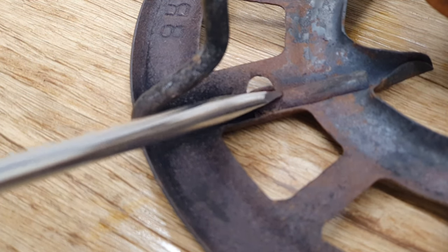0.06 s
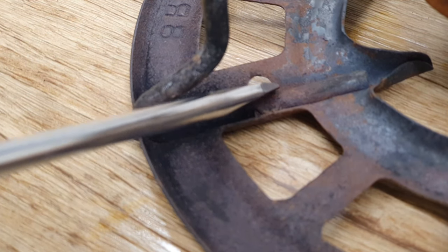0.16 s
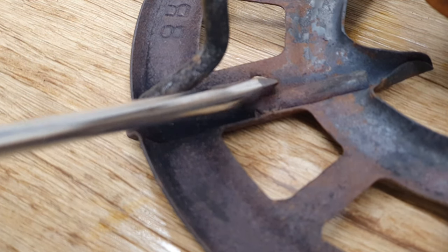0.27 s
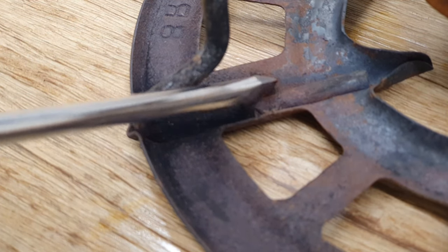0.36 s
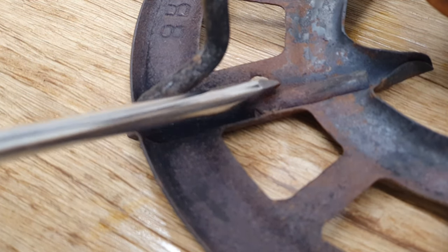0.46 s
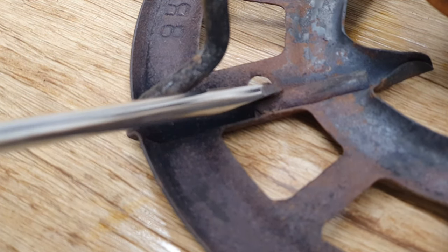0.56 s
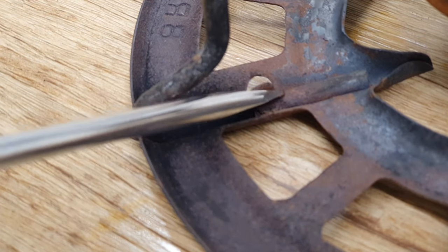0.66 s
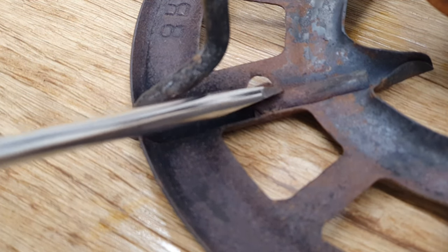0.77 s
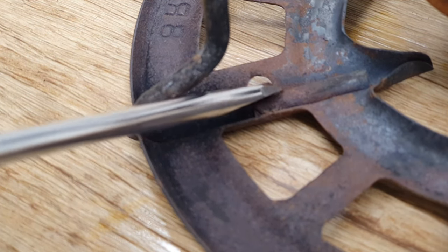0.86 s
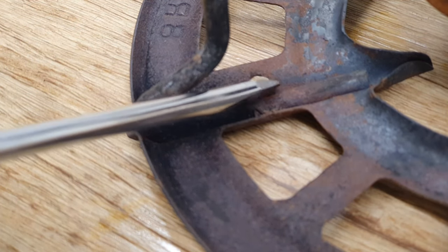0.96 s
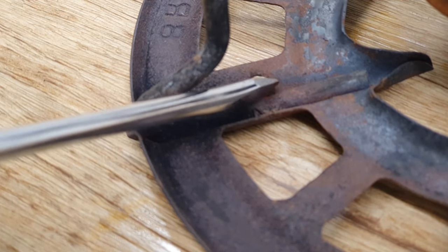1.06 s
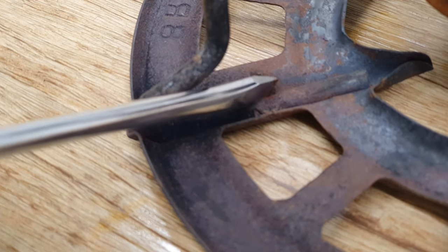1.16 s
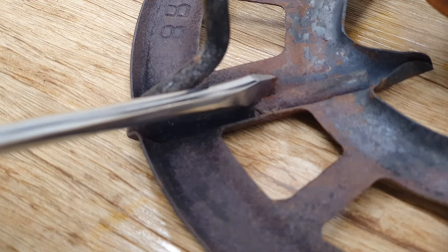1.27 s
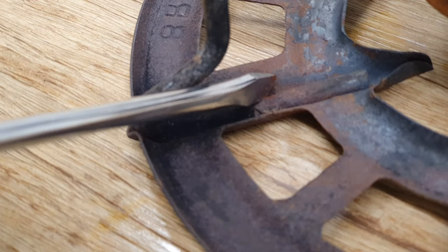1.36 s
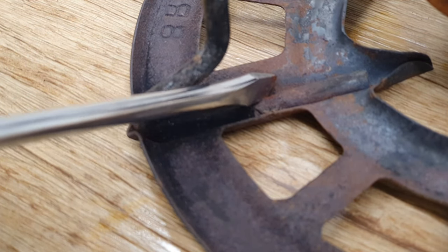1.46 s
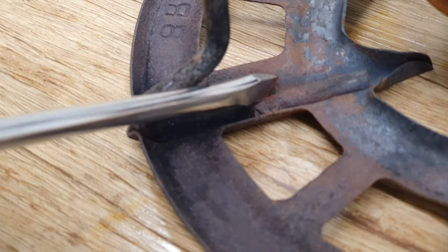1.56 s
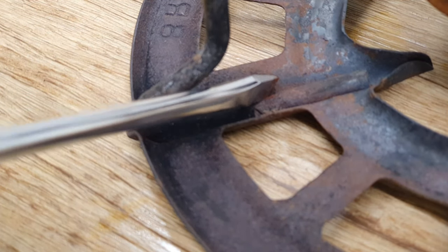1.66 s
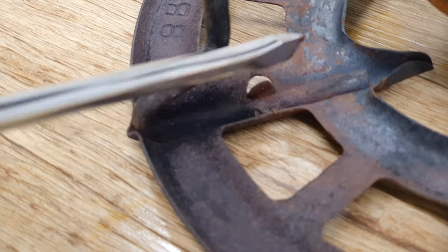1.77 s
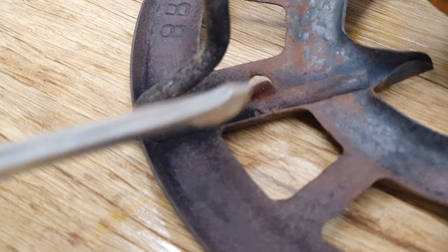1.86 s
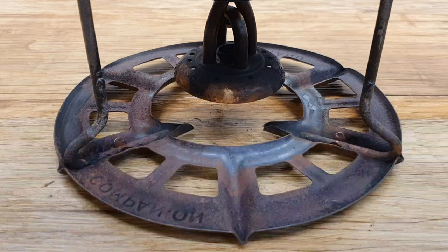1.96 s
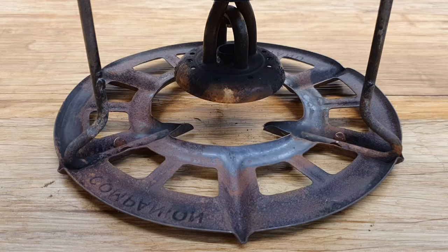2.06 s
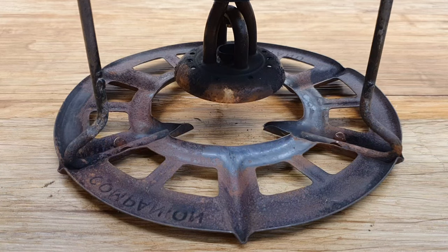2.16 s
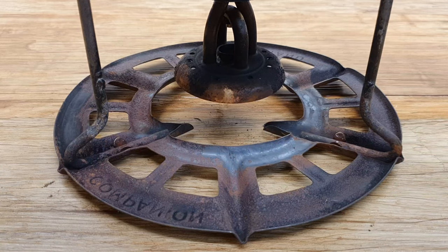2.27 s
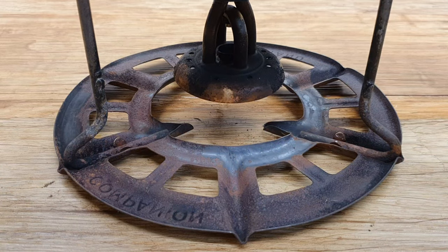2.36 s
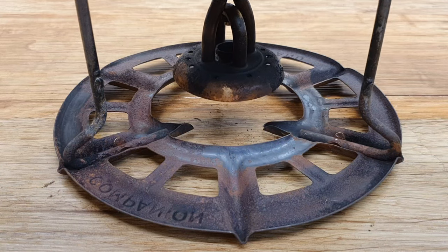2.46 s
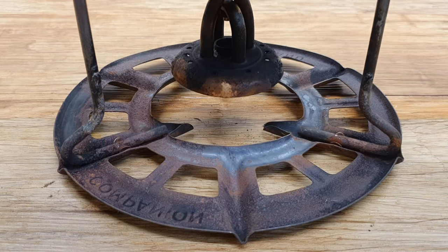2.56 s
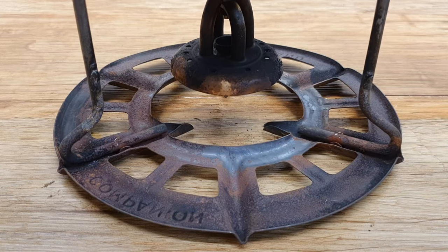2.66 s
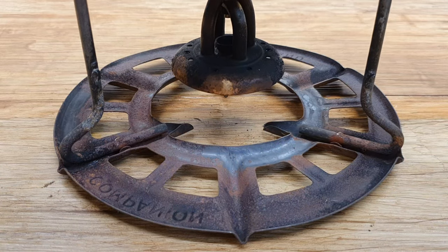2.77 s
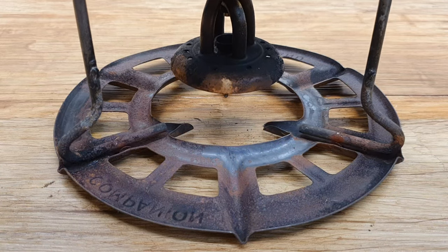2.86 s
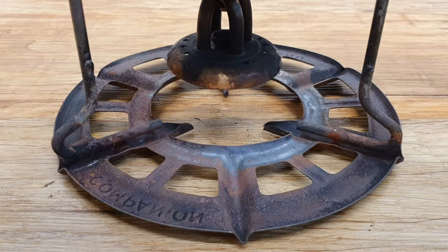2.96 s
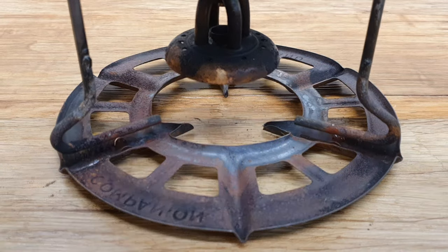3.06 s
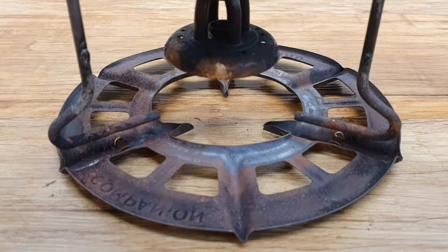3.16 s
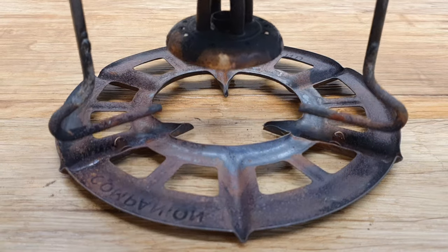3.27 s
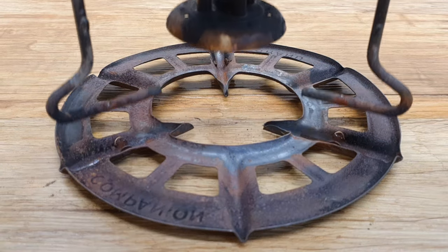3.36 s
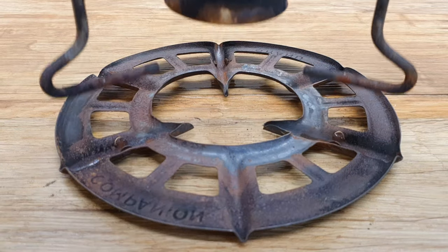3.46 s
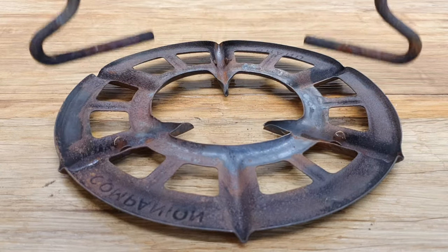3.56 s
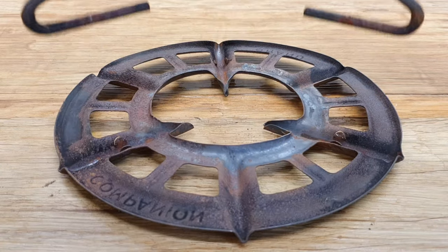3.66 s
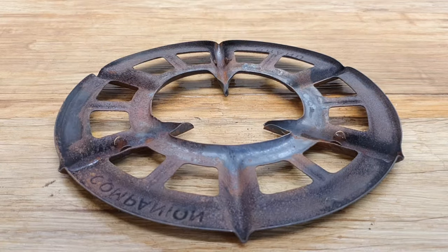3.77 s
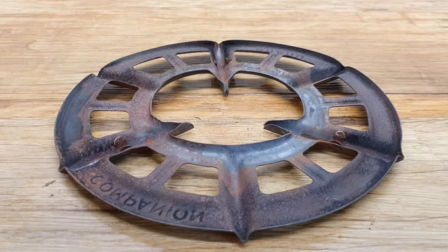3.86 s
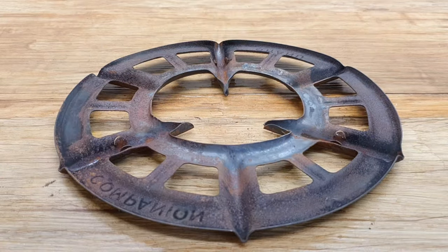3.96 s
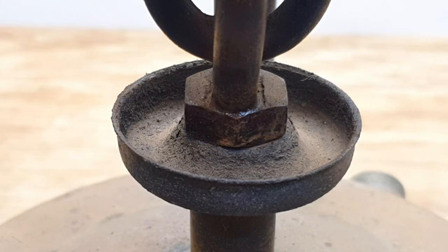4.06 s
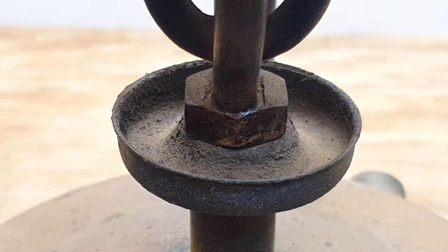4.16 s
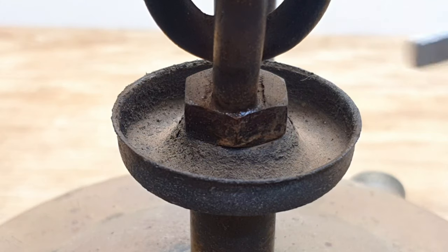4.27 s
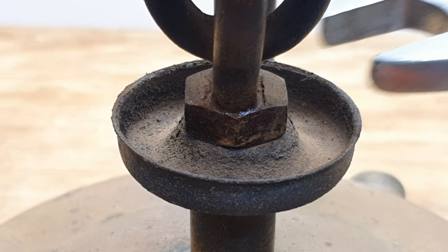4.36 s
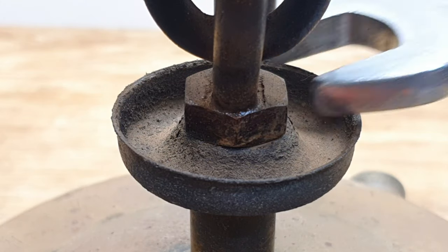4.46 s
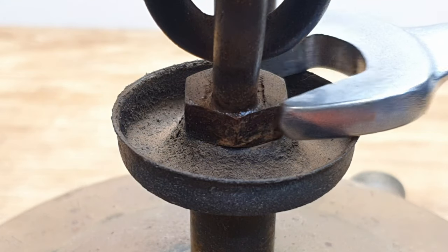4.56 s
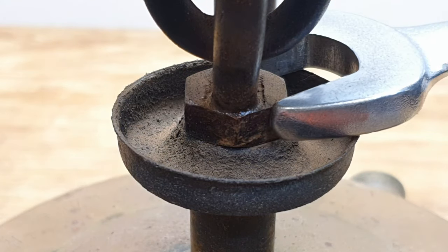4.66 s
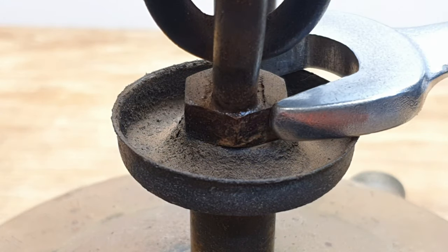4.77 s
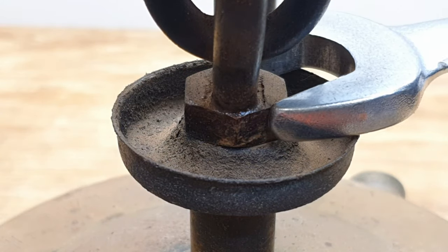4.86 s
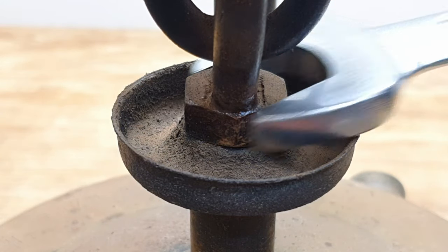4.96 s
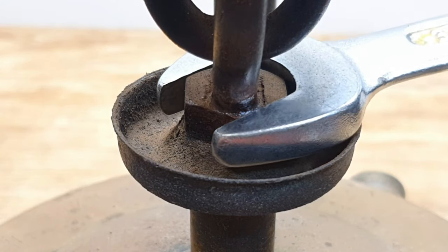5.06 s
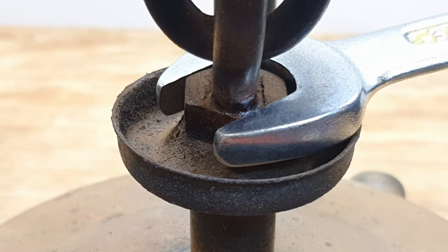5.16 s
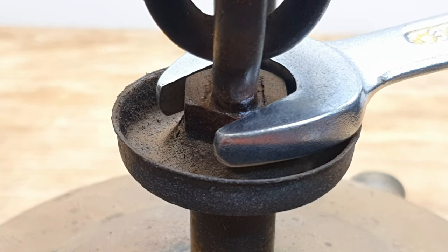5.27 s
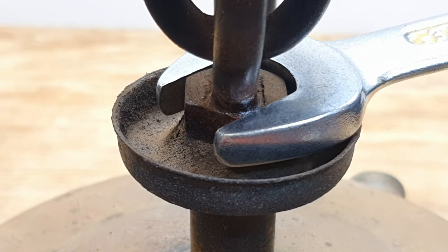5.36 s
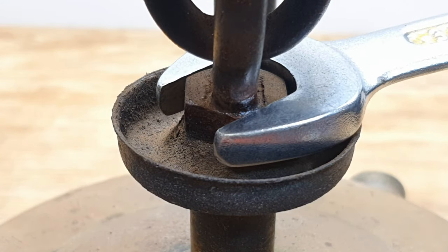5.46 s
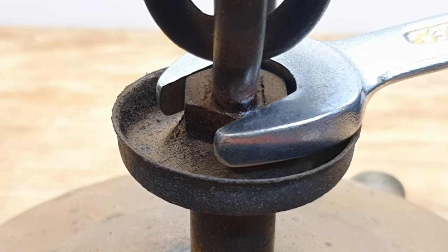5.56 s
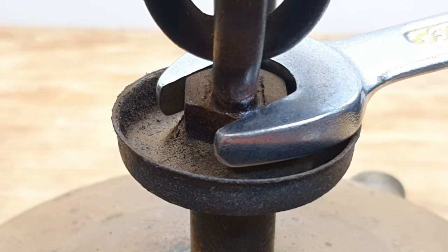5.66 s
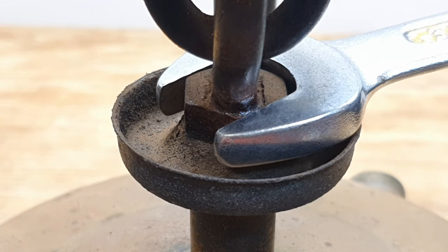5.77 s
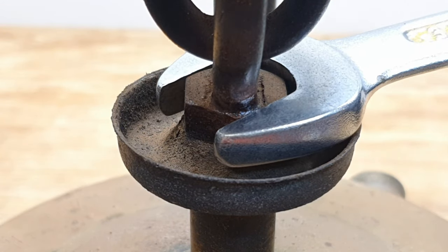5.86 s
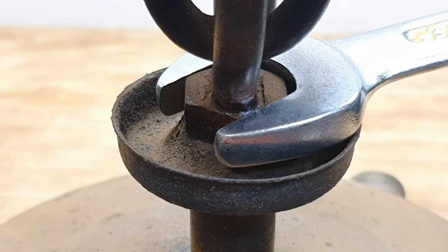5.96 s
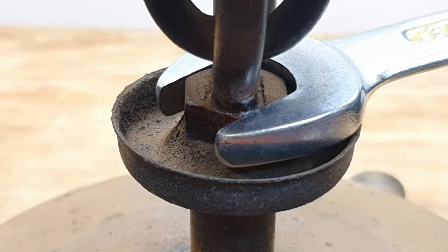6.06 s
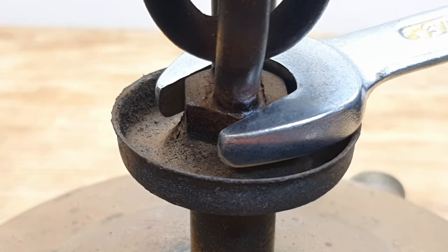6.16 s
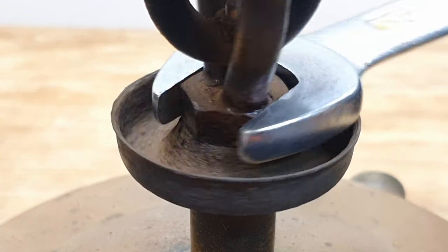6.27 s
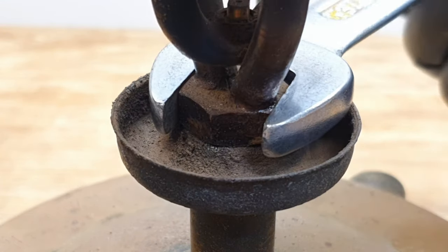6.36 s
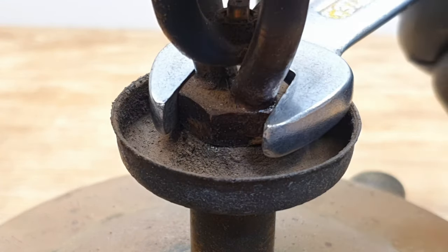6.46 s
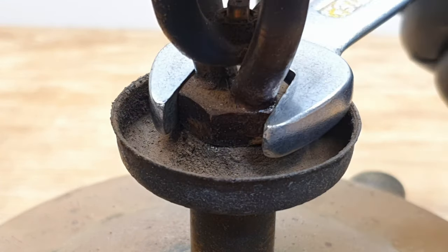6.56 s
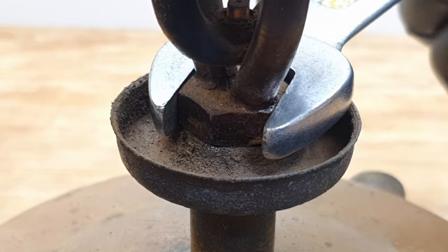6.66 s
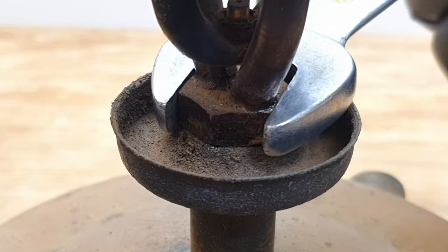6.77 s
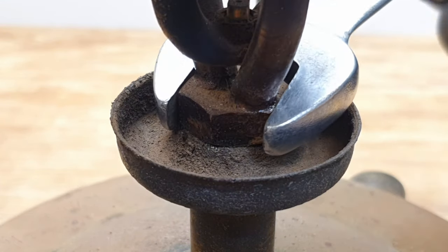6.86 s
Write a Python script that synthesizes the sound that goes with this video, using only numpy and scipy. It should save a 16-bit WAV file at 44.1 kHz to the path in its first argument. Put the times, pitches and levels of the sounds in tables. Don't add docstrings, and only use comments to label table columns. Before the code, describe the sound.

A screwdriver tip picks and scrapes at rusty metal, a wire frame rattles and drags off a grate, then a spanner clanks hard onto a nut.

```python
import sys
import numpy as np
from scipy import signal
from scipy.fft import rfft, irfft, next_fast_len
from scipy.io import wavfile
from scipy.ndimage import uniform_filter1d

SR = 44100
rng = np.random.default_rng(int(sys.argv[2]) if len(sys.argv) > 2 else 0)


def natural_amplitude(level_db):
    exponent = np.asarray(level_db, float) / 20
    return 10 ** exponent


def dump(signal):
    limited = np.clip(np.atleast_2d(signal).T, -1, 1)
    pcm = np.round(limited * 32767).astype(np.int16)
    wavfile.write(sys.argv[1], SR, pcm)


N = 304731
SIZE = next_fast_len(N + SR)
HZ = np.fft.rfftfreq(SIZE, 1 / SR)
TIME = np.arange(N) / SR

# pitch_hz, likeness (0-1)
NEAR_SAME = [(150, 0.2), (600, 0.9), (1200, 0.4), (3000, 0), (16000, 0.6)]
# pitch_hz, level_db (per Hz)
TIP_TONE = [(120, -9), (200, 1.5), (360, -11.5), (529, -5), (722, -14), (916, -13), (1060, -17.5),
            (4200, -16), (5040, -20.5), (7680, -13.5), (10100, -22.5), (12600, -16), (16000, -19.5)]
# pitch_hz, level_db (per Hz)
FRAME_TONE = [(100, -42), (170, -0.5), (284, 10.5), (430, -27), (631, 2.5), (764, -3.5), (1490, -16),
              (1830, -35), (4200, -21), (5000, -17), (7200, -6.5), (14800, -1.5), (16000, -18)]
# pitch_hz, level_db, t60_s
NUT_MODES = [(117, -11.5, 0.11), (137, -16, 0.36), (189, -18, 0.13), (227, -15.5, 0.1207),
             (563, 0.5, 0.042), (1039, -17.5, 0.092), (1400, -3, 0.057), (1868, -4, 0.052),
             (2125, -10.5, 0.22), (2855, -4.5, 0.039), (3090, 0.5, 0.037), (3430, -14.5, 0.068),
             (3502, -2.5, 0.025), (6370, -29, 0.051)]


def evened(x):
    return x / np.sqrt(np.mean(x ** 2) + 1e-20)


def read(points, hz):
    f, value = np.transpose(points)
    return np.interp(np.log(hz + 1), np.log(f + 1), value)


def level_curve(rows):
    s, db = np.transpose(rows)
    return natural_amplitude(np.interp(TIME, s, db))


def add(mix, s, sound):
    part = mix[..., round(s * SR):][..., :sound.shape[-1]]
    part += sound[..., :part.shape[-1]]


def band(hz, lo_hz, hi_hz):
    return 1 / np.sqrt((1 + (lo_hz / (hz + 1)) ** 12) * (1 + (hz / hi_hz) ** 12))


def balance(points):
    return natural_amplitude(read(points, HZ) / 2 * np.array([[1], [-1]]))


def paired(z, hz, likeness):
    late_s = 0.00008
    same = np.clip(read(likeness, hz), 0, 1)
    shared = same * z[0] * np.exp(-2j * np.pi * hz * late_s)
    return np.array([z[0], shared + np.sqrt(1 - same ** 2) * z[1]])


def diffuse(tone):
    # pitch_hz, likeness (0-1)
    room_same = [(60, .93), (250, 0.59), (600, 0.15), (1200, 0.078), (16000, .05)]
    # pitch_hz, level_db
    room_lean = [(60, -0.67), (180, -0.34), (550, -1.5), (1650, 0.8), (4970, 2.5), (15000, 0)]
    z = paired(rfft(rng.standard_normal((2, SIZE))), HZ, room_same)
    return evened(irfft(z * balance(room_lean) * natural_amplitude(read(tone, HZ)), SIZE)[:, :N])


def room_tone():
    # pitch_hz, level_db (per Hz)
    air = [(100, -25.5), (150, -5), (300, -19.5), (600, -22), (1400, -27.5), (2500, -30.5), (6000, -35.5),
           (7700, -36.5), (9000, -43.5), (11000, -38), (13000, -35.5), (16000, -31)]
    # time_s, level_db
    air_level = [(0, -66), (2.08, -71), (2.1, -72), (4.1, -74), (4.15, -72.5), (6.91, -74.5)]
    # pitch_hz, level_db (per Hz)
    rumble = [(12, -49), (20, -8), (76, 7.5), (93, 3.5), (119, -5.5), (173, -12.5), (219, -24),
              (260, -19.5), (340, -50.5), (570, -120)]
    # time_s, level_db
    rumble_level = [(0, -61), (0.55, -58.5), (1.3, -54.5), (1.75, -63.5), (2.3, -61.5), (3.2, -62),
                    (3.95, -64), (4.15, -66.5), (5.9, -68.5), (6.75, -66), (6.91, -53)]
    return level_curve(air_level) * diffuse(air) + level_curve(rumble_level) * diffuse(rumble)


def snaps(rows, tone, low_hz):
    even_db, db_octave_per_db, dullest_db, faint_db = -44, 0.4, -2, -59.7
    out, t = np.zeros((2, N)), np.arange(4096) / SR
    hz = np.fft.rfftfreq(len(t), 1 / SR)
    spectra = rfft(rng.standard_normal((len(rows), 3, len(t))))
    for (s, db, thump_db, t60_ms), z in zip(rows, spectra):
        t60 = max(t60_ms, 3) / 1000
        fall = 0.68 * natural_amplitude(-60 * t / t60) + 0.14 * natural_amplitude(-60 * t / (4 * t60))
        bright_db = max(db_octave_per_db * (db - even_db), dullest_db if db > faint_db else 0)
        tilt_db = read(tone, hz) + bright_db * np.log2(hz / 6000 + 0.072)
        crack = evened(irfft(paired(z, hz, NEAR_SAME) * natural_amplitude(tilt_db) * band(hz, low_hz, SR)))
        thump = evened(irfft(z[2] / (1 + ((hz - 420) / 200) ** 2)))
        rise = np.minimum(t / (0.22 * t60), 1) ** 2
        sound = crack * fall + natural_amplitude(thump_db - 60 * t / 0.041) * thump
        add(out, s - 0.12 * t60, natural_amplitude(db) * sound * rise)
    return out


def pressure(rows, t, bite_s):
    lift_s, settle_s = 0.0064, 0.032
    body_share = 0.5
    start, length, grit_db, bench_db = np.transpose(rows)[..., None]
    rise = np.clip((t - start) / bite_s, 0, 1) ** 3
    past = np.maximum(t - start - length, 0)
    grit = (natural_amplitude(grit_db) * rise * np.exp(-past / lift_s)).sum(0)
    bench = (natural_amplitude(bench_db) * rise * np.exp(-past / settle_s)).sum(0)
    return grit, grit ** (1 - body_share) * bench ** body_share, bench


def wandering(sound, splits_hz, patchy_db, hollow_db):
    bins, _, z = signal.stft(sound, SR, nperseg=512, noverlap=384)
    patches = uniform_filter1d(rng.standard_normal((770, 257)), size=24, axis=0)
    patches = uniform_filter1d(patches, size=2, axis=1)
    patches = evened(patches).T[:, :z.shape[2]]
    hollows = hollow_db * band(bins, *splits_hz)[:, None] * np.clip(-patches, 0, 1)
    gain = natural_amplitude(patchy_db * patches + hollows)
    return signal.istft(z * gain, nperseg=512, noverlap=384)[1][:, :sound.shape[1]]


def stroke(rows, tone, splits_hz, bite_s, body_db, rough_db, patchy_db, hollow_db=0, rings=()):
    first_s, last_s = rows[0][0], sum(rows[-1][:2])
    blocks = int((last_s - first_s) * SR / 2048 + 3)
    t = first_s + np.arange(2048 * blocks) / SR
    hz = np.fft.rfftfreq(len(t), 1 / SR)
    noise = rng.standard_normal((98304, 4)).T[:, :len(t)]
    bite = evened(uniform_filter1d(noise[2], size=50)) + evened(uniform_filter1d(noise[3], size=400))
    slips = paired(rfft(noise[:2] * natural_amplitude(rough_db * bite)), hz, NEAR_SAME)
    colour = natural_amplitude(read(tone, hz))
    for f, width, db in rings:
        colour = colour + natural_amplitude(read(tone, f) + db + 25) / (1 + (2 * (hz - f) / width) ** 2)
    grit, body, bench = pressure(rows, t, bite_s)
    low, high = splits_hz
    layers = [(grit, high, SR / 2), (body * natural_amplitude(body_db), low, high), (bench, 160, low)]
    sound = sum(gain * evened(irfft(slips * colour * band(hz, lo, hi))) for gain, lo, hi in layers)
    out = np.zeros((2, N))
    add(out, first_s, wandering(sound, splits_hz, patchy_db, hollow_db))
    return out


def contact_force(rows):
    force = np.zeros(N)
    for s, db, contact_ms in rows:
        u = np.arange(0, 1, 1000 / (max(contact_ms, 0.05) * SR))
        push = np.sin(np.pi * u) ** 2 + 1e-9
        add(force, s, natural_amplitude(db) * push / push.sum())
    return force


def bandpass(x, order, edges_hz):
    return signal.sosfilt(signal.butter(order, edges_hz, "bandpass", fs=SR, output="sos"), x)


def knocks(rows, modes, clack_db, thud_db, scatter, rattle_db=-60):
    t = np.arange(SR // 2) / SR
    hz, db, t60 = np.transpose(modes)[..., None]
    phase, apart, split = rng.uniform(-np.pi, np.pi, (len(modes), 3, 1)).transpose(1, 0, 2)
    apart = apart * scatter * np.clip(hz / 1400, 0, 1)
    swell = 1 - np.exp(-t * np.sqrt(hz) * 25)
    beat = 1 + 0.5 * np.cos(hz * 0.004 * split * t + phase)
    envelope = natural_amplitude(db - 60 * t / t60) * swell * beat
    ring = np.array([(envelope * np.sin(2 * np.pi * hz * t + phase + side * apart)).sum(0)
                     for side in (0, 1)])
    noise = rng.standard_normal((5, len(t) + 1))
    clack = np.diff(noise[:2]) * natural_amplitude(clack_db - 60 * t / 0.058)
    crowd = evened(bandpass(noise[3:, 1:], 3, (650, 4700)))
    rattle = crowd * natural_amplitude(rattle_db) * (natural_amplitude(-60 * t / 0.036) + 0.043 * natural_amplitude(-60 * t / 0.22))
    thud = evened(bandpass(noise[2, 1:], 2, (80, 210))) * natural_amplitude(thud_db - 60 * t / 0.19)
    response = ring / 2 + clack + rattle + thud
    return signal.oaconvolve(contact_force(rows)[None], response, axes=1)[:, :N]


def rust_flakes():
    # start_s, peak_db, thump_db (bench, re peak), t60_ms
    flakes = [(0.0508, -48, -33, 19), (0.0617, -41, -18, 5.8), (0.0956, -40, -17, 20.5),
              (0.173, -36.5, -39, 26), (0.227, -62, -30, 11), (0.288, -33, -36, 5.7),
              (0.309, -53, -26, 7.8), (.327, -60, -25, 8.4), (0.3565, -38, -32, 5.1), (.41, -48, -9, 10),
              (.434, -56, -8, 6), (.532, -54, -32, 4), (.381, -52.5, -5.5, 11), (0.476, -62.5, 13.5, 20),
              (0.495, -47, -24, 16), (.52, -54, -9, 8.8), (.589, -54, -15, 8.6), (0.621, -33.5, -10.5, 15),
              (.664, -54, -30, 10), (.683, -54, -25, 10), (0.768, -32, -40, 8.3), (.8525, -43, -34, 11),
              (0.883, -39, -42, 16), (.991, -63, -25, 7.3), (1.068, -52, -5, 9.5), (1.1253, -44, -10, 12.5),
              (1.159, -39, -36, 14.4), (1.2194, -42.5, -14, 5.1), (1.2441, -41, -15, 16.5),
              (1.3014, -42, -24, 7.3), (1.314, -43, -14, 5.9), (1.342, -44, -25, 7.6),
              (1.3788, -38, -38, 4.4), (1.386, -42, -33, 7.3), (1.399, -43, -11, 12),
              (1.4337, -43, -29, 5.7), (1.4553, -32, -41, 12.7), (1.478, -41, -10, 13),
              (1.538, -42.5, -2.5, 9.5), (1.5973, -47, -4, 16), (1.6245, -40, -17.5, 7.9),
              (1.634, -45, -14, 6.8), (1.693, -55, -30, 7.7), (2.0213, -51.5, -18, 17),
              (2.048, -59, -16, 7.3)]
    return snaps(flakes, TIP_TONE, 900)


def tip_landing():
    # start_s, length_s, grit_db, bench_db
    skid = [
        (.082, .04, -49, -52),
    ]
    # pitch_hz, level_db (per Hz)
    skid_tone = [(88, -34), (150, 3), (555, -18), (1600, -25), (2980, -18), (5050, -22.5), (5910, -19.5),
                 (8070, -22.5), (16000, -14.5)]
    return stroke(skid, skid_tone, (850, 4700), bite_s=0.0074, body_db=-8, rough_db=0, patchy_db=-0.5)


def bench_knocks():
    # start_s, peak_db, contact_ms
    jolts = [
        (.092, -43, 0.69),
        (.1, -33.5, 0.73),
        (.112, -30.5, 0.69),
        (.121, -32, 0.98),
    ]
    # pitch_hz, level_db, t60_s
    bench_modes = [(267.5, -9.5, 0.29), (541, -1, 0.034), (780, -32, 0.064), (919, -26, 0.2),
                   (1420, -57, 5.0), (2000, -26, 0.47)]
    return knocks(jolts, bench_modes, clack_db=-30, thud_db=-39, scatter=0.44)


def squeaks():
    # start_s, length_s, pitch_hz, width_hz, level_db
    rubs = [(.11, .09, 2100, 200, -72), (5.034, .016, 2500, 3000, -70), (5.281, .012, 5500, 3500, -74),
            (6.564, .014, 6000, 3000, -76), (6.666, .012, 8800, 4500, -70), (6.705, .016, 6800, 2000, -78),
            (5.42, .36, 1650, 500, -80), (5.44, .34, 13500, 4000, -80), (6.84, .07, 7200, 1500, -78),
            (1.08, .58, 180, 70, -66), (2.7, .09, 12300, 500, -58), (3.0, .2, 750, 400, -79),
            (3.8, .2, 6000, 4000, -82), (.22, .18, 7400, 1200, -76), (1.1, .55, 400, 300, -72),
            (2.21, .05, 1100, 500, -74), (3.62, .16, 1260, 40, -84), (3.8, .18, 3600, 900, -84),
            (3.85, .08, 7300, 120, -88), (4.34, .22, 1640, 130, -82), (6.37, .06, 1800, 200, -72),
            (6.86, .05, 1740, 200, -72), (5.62, .125, 5760, 60, -80), (6.57, .05, 1600, 200, -80),
            (6.835, .07, 60, 30, -53), (2.33, .04, 260, 160, -62), (3.05, 1.07, 88, 14, -63),
            (2.1, 2.02, 700, 25, -88), (2.1, 2.02, 1045, 25, -90)]
    out = np.zeros((2, N))
    spectra = rfft(rng.standard_normal((len(rubs), 2, 98304)))
    hz = np.fft.rfftfreq(98304, 1 / SR)
    for (s, length, f, width, db), z in zip(rubs, spectra):
        resonance = 1 / (1 + (2 * (hz - f) / width) ** 4)
        ring = evened(irfft(paired(z, hz, NEAR_SAME) * resonance))[:, :int(length * SR)]
        add(out, s, natural_amplitude(db) * ring * signal.windows.tukey(ring.shape[1], 0.6))
    return out


def tip_scrapes():
    # start_s, length_s, grit_db, bench_db
    scrapes = [(.14, 0.19, -72.5, -84), (.35, 0.083, -68.5, -72.5), (.45, 0.069, -74, -73),
               (.59, 0.096, -70.5, -70.5), (.68, .11, -63.5, -72), (.81, 0.12, -66.5, -76),
               (.94, 0.14, -79.5, -91), (1.06, 0.16, -71, -67.5), (1.22, 0.19, -74, -63.5),
               (1.42, 0.074, -63.5, -73), (1.5, 0.16, -80, -70), (1.74, 0.08, -78, -81),
               (1.815, 0.026, -60.5, -64.5), (1.875, 0.037, -61.5, -71), (1.97, 0.16, -73, -77)]
    return stroke(scrapes, TIP_TONE, (850, 4700), bite_s=0.013, body_db=-7.5, rough_db=3, patchy_db=2)


def frame_nudges():
    # start_s, length_s, grit_db, bench_db
    nudges = [
        (2.07, 0.065, -81, -85),
        (2.155, 0.021, -62, -73),
        (2.195, 0.034, -63.5, -67),
        (2.3, 0.29, -87.5, -75.5),
        (2.462, 0.03, -52, -56.5),
    ]
    return stroke(nudges, TIP_TONE, (850, 4700), bite_s=0.029, body_db=-5.5, rough_db=3, patchy_db=3.5)


def grate_knocks():
    # start_s, peak_db, contact_ms
    hits = [
        (2.456, -30.5, 1.27),
        (2.474, -51, 0.11),
        (2.480, -26.5, 0.67),
        (2.487, -34, 0.31),
        (2.492, -28.5, 0.38),
        (2.506, -40, 0.27),
    ]
    # pitch_hz, level_db, t60_s
    grate_modes = [(568, -10.5, 0.13), (963, -6, 0.061), (1314, -10, 0.2), (1475, -2.5, 0.24),
                   (2080, -5, 0.16), (2700, -22, 0.044), (2940, -24, 0.13), (3580, -23, 0.032),
                   (3779, -10, 0.12), (4430, -15, 0.12), (6970, -12, 0.24)]
    return knocks(hits, grate_modes, clack_db=8, thud_db=-27, scatter=0.72, rattle_db=-5.5)


def frame_drag():
    # start_s, length_s, grit_db, bench_db
    drags = [
        (2.575, 0.086, -63, -59.5),
        (2.62, 0.076, -53, -59.5),
        (2.685, 0.09, -49, -58),
        (2.78, 0.04, -60.5, -64.5),
        (2.81, .11, -54, -63.5),
        (2.91, 0.13, -55.5, -64),
    ]
    # pitch_hz, width_hz, level_db
    wire_rings = [(617, 81, -17.5), (988, 102, -12.5), (1433, 53, -10), (2130, 110, -12), (2390, 53, -2.5),
                  (2780, 50, -7), (3120, 40, -12), (3470, 59, -9), (4130, 44, -13), (4580, 50, -9),
                  (4950, 72, -9.5), (5190, 79, -14), (5500, 67, -15), (5970, 70, -6.5), (6750, 31, -20),
                  (6940, 61, -5), (7400, 450, -13), (9050, 160, -15), (9680, 100, -15.5), (12270, 200, -15),
                  (12600, 220, -20), (13200, 67, -26), (14000, 72, -17), (14500, 120, -14),
                  (14630, 88, -11), (15000, 230, -3.5)]
    return stroke(drags, FRAME_TONE, (1600, 4500), bite_s=0.032, body_db=-8, rough_db=0.5, patchy_db=4,
                  hollow_db=-23, rings=wire_rings)


def frame_catches():
    # start_s, peak_db, thump_db (bench, re peak), t60_ms
    catches = [
        (2.6023, -48, -30, 18),
        (2.6412, -44, -30, 14),
        (2.6596, -42, -30, 14),
        (2.7125, -28.5, -32, 16),
        (2.76, -38, -30, 14),
        (2.8483, -34.5, -37, 14),
        (2.897, -40, -29, 9),
        (2.9523, -30, -36, 16),
        (3.0143, -39.5, -21, 20),
    ]
    return snaps(catches, FRAME_TONE, 4400)


def handling():
    # start_s, length_s, grit_db, bench_db
    shifts = [
        (3.621, 0.56, -100, -81.5),
        (4.33, 0.24, -96, -76.5),
        (5.38, 0.2, -82.5, -77),
        (5.58, .19, -78.5, -80),
        (6.751, 0.2, -90, -74.5),
    ]
    # pitch_hz, level_db (per Hz)
    hand_tone = [(170, 4), (680, -7), (1000, -18.5), (1400, -11.5), (2800, -21), (5000, -19), (7300, -9.5),
                 (9000, -20), (11500, -16.5), (14000, -19), (16000, -38.5)]
    return sum(stroke([row], hand_tone, (850, 4700), bite_s=0.04, body_db=-1.3, rough_db=3, patchy_db=-3)
               for row in shifts)


def spanner_ticks():
    # start_s, peak_db, thump_db (bench, re peak), t60_ms
    ticks = [(5.1, -46.5, -29.5, 14), (5.125, -46.5, -30, 20), (5.162, -32, -39.5, 16),
             (5.174, -40.5, -39.5, 10), (3.854, -58.5, -27, 19), (3.975, -66, -26, 16),
             (4.179, -58.5, -25, 15), (5.6186, -63, -4, 8), (5.6, -61, -8, 8.5), (6.025, -67, -21, 17),
             (6.4335, -42, -26, 11.3), (6.4776, -44.5, 3, 12.8)]
    return snaps(ticks, TIP_TONE, 900)


def jaw_knocks():
    # start_s, peak_db, contact_ms
    touches = [
        (4.673, -36, 1),
        (4.678, -45, 0.06),
        (4.68, -26.5, 0.3),
        (4.687, -37.5, 0.29),
        (6.434, -42, 0.068),
        (6.442, -43, 0.1),
        (6.479, -40, 0.74),
    ]
    # pitch_hz, level_db, t60_s
    jaw_modes = [(252, 4.5, 0.037), (580, 2.5, 0.044), (1955, -5.5, 0.02), (3032, -0.5, 0.038),
                 (3915, 14.5, 0.0093), (7400, -10.5, 0.035)]
    return knocks(touches, jaw_modes, clack_db=-18.5, thud_db=-16.5, scatter=0.26, rattle_db=-13)


def rim_knocks():
    # start_s, peak_db, contact_ms
    hits = [
        (4.698, -16, 0.2),
        (4.701, -19.5, 0.39),
        (4.705, -17.5, 0.44),
        (4.751, -47.5, 0.26),
    ]
    # pitch_hz, level_db, t60_s
    rim_modes = [(130, -11.5, 0.22), (193.2, -4.5, 0.11), (229, -16, 0.14), (400, -8, 0.026),
                 (584, 6, 0.012), (770, -21, 0.17), (1067, -12.5, 0.053), (1365, -1, 0.06),
                 (1828, -2, 0.021), (2039, -5.5, 0.095), (2456, -5, 0.016), (2917, 4, 0.018),
                 (3094, -26.5, 0.14), (3530, 2, 0.054), (4100, -5, 0.031)]
    return knocks(hits, rim_modes, clack_db=-19.5, thud_db=-32, scatter=0.55, rattle_db=-20)


def spanner_knocks():
    # start_s, peak_db, contact_ms
    hits = [
        (4.705, -49, 0.08),
        (5.172, -34.5, 0.061),
    ]
    # pitch_hz, level_db, t60_s
    spanner_modes = [(2057, -27.5, 0.28), (2152, -22, .2), (2850, -14.5, 0.43), (3040, -13.5, 0.3),
                     (4245, -7.5, 0.066), (4385, 4.5, 0.2), (5100, -25.5, 0.3), (7030, -29, 0.48)]
    return knocks(hits, spanner_modes, clack_db=-28.5, thud_db=-51.5, scatter=0.3)


def returning_ring():
    # start_s, peak_db, contact_ms
    ring_returns = [
        (4.742, -38, .15),
        (4.751, -35, 0.11),
    ]
    # pitch_hz, level_db, t60_s
    returning_modes = [(3590, -6, 0.056), (4420, -15.5, .08)]
    return knocks(ring_returns, returning_modes, clack_db=-30, thud_db=-47, scatter=0.4, rattle_db=-29.5)


def spanner_slide():
    # start_s, length_s, grit_db, bench_db
    slides = [
        (5.073, .065, -55, -52.5),
        (5.125, 0.024, -68.5, -41.5),
    ]
    # pitch_hz, level_db (per Hz)
    slide_tone = [(100, -49.5), (170, -15), (258, 2), (364, -29), (522, -6), (856, -30), (2130, -6.5),
                  (2680, -23), (3920, -4), (4920, -22.5), (8200, -24), (9500, -39.5), (13000, -34),
                  (16000, -42)]
    rings = [(f, 140, db - 8.5) for f, db, _ in NUT_MODES]
    return stroke(slides, slide_tone, (850, 5000), bite_s=0.033, body_db=3.5, rough_db=1.5, patchy_db=3,
                  rings=rings)


def nut_knocks():
    # start_s, peak_db, contact_ms
    hits = [
        (5.149, -29, 1.9),
        (5.160, -27, 0.17),
        (5.1635, -11, 0.17),
        (5.1655, -13, 0.19),
        (5.168, -12.5, 0.14),
        (5.1685, -9.5, 0.97),
        (5.176, -29, 0.24),
    ]
    return knocks(hits, NUT_MODES, clack_db=-25.5, thud_db=-31, scatter=0.85, rattle_db=-19)


def spanner_slip():
    # start_s, length_s, grit_db, bench_db
    slip = [
        (6.385, 0.057, -63.5, -66.5),
    ]
    # pitch_hz, level_db (per Hz)
    slip_tone = [(88, -49.5), (150, -15), (315, -1), (624, -9), (1210, -19), (4000, -11.5), (4950, -15),
                 (7920, -8), (16000, -28)]
    return stroke(slip, slip_tone, (850, 4700), bite_s=0.04, body_db=2, rough_db=4, patchy_db=1)


def microphones(x, wet_db=-16):
    # pitch_hz, level_db
    near_lean = [(150, -1.5), (600, 0.3), (1200, -1), (2000, 7.5), (3500, 5), (4500, 0.5), (6500, 10),
                 (9500, 4), (14000, 3.5)]
    # pitch_hz, t60_s
    shop_decay = [(100, 0.2), (500, 0.13), (2000, 0.17), (8000, 0.05), (16000, 0.12)]
    near = irfft(rfft(x, SIZE) * balance(near_lean), SIZE)[..., :N]
    taps = np.zeros((2, SR // 2))
    at = np.arange(200, SR // 2 - 20, 20) + rng.integers(0, 20, (2, (SR // 2 - 201) // 20))
    np.put_along_axis(taps, at, rng.choice([-1., 1.], at.shape), 1)
    hz, t, z = signal.stft(taps, SR, nperseg=256)
    fade = natural_amplitude(-60 * t / read(shop_decay, hz)[:, None])
    tail = signal.istft(z * fade, SR, nperseg=256)[1]
    tail = tail / np.linalg.norm(tail[0])
    return near + natural_amplitude(wet_db) * signal.oaconvolve(x, tail, axes=1)[:, :N]


def scene():
    work = rust_flakes() + spanner_ticks() + frame_catches() + squeaks()
    work += frame_nudges() + tip_scrapes() + frame_drag() + spanner_slide()
    work += handling() + tip_landing() + spanner_slip()
    work += bench_knocks() + returning_ring() + grate_knocks() + rim_knocks()
    work += nut_knocks() + jaw_knocks() + spanner_knocks()
    return microphones(work) + room_tone()


def band_limit(x):
    return signal.sosfilt(signal.butter(12, 16520, fs=SR, output="sos"), x)


def record(dry):
    # start_s, end_s, level_db
    dropout = (2.072, 2.092, -63)
    start, end, db = dropout
    kept = np.where((TIME > start) & (TIME < end), natural_amplitude(db), 1.)
    lowpass = signal.firwin(511, 15900, window=("kaiser", 5), fs=SR)
    limited = signal.oaconvolve(dry * kept, lowpass[None], "same")
    return band_limit(limited)


dry = scene()
out = record(dry)
dump(out)
```